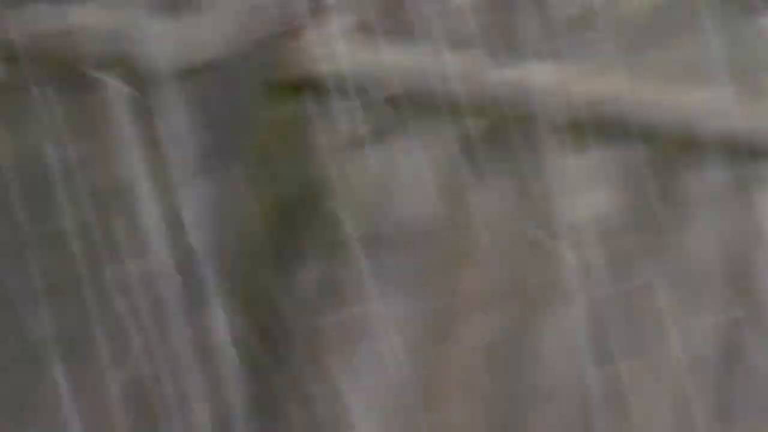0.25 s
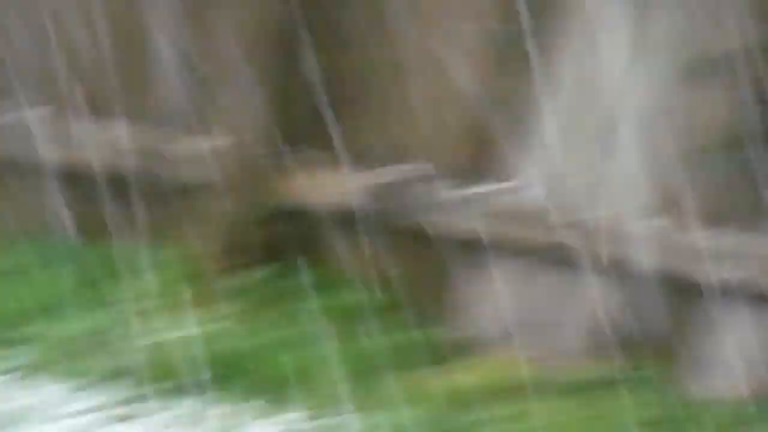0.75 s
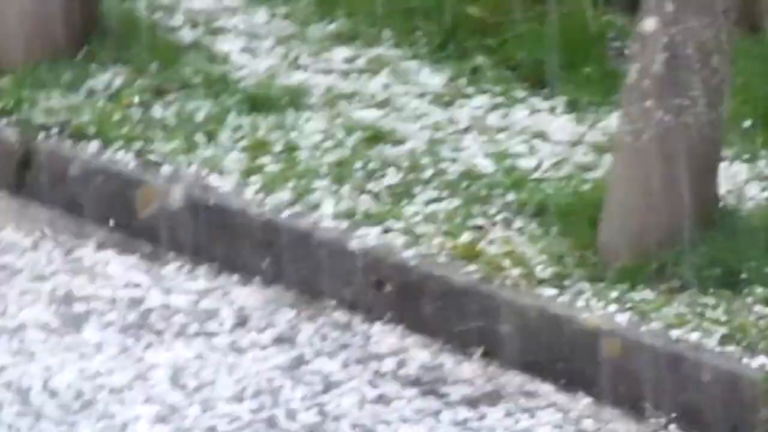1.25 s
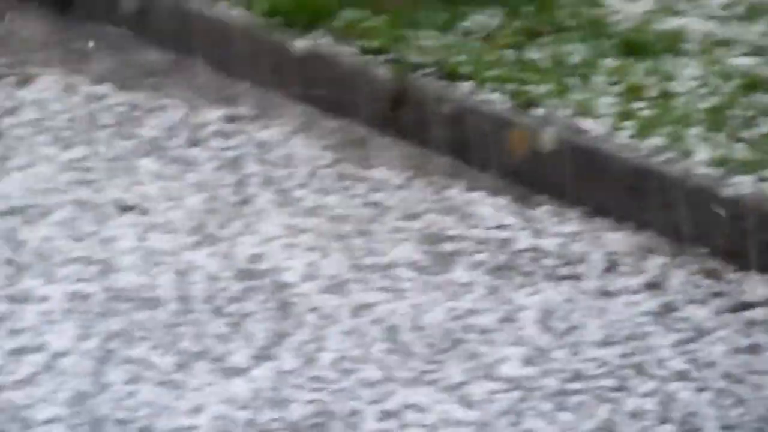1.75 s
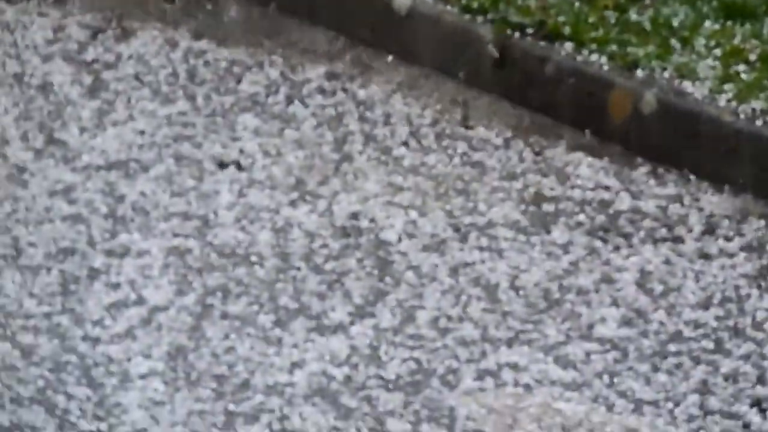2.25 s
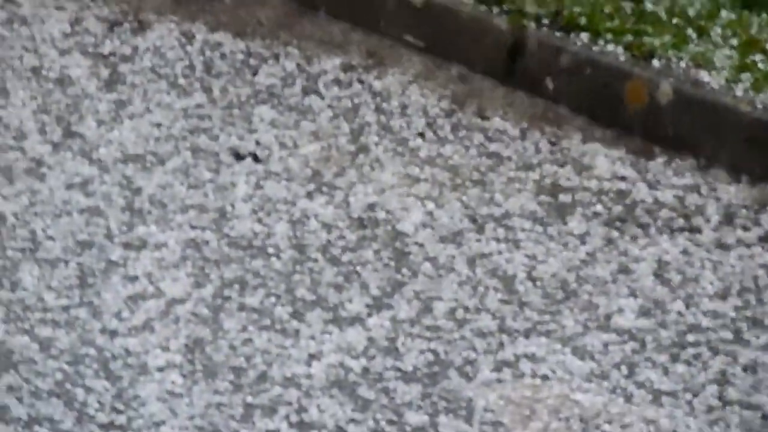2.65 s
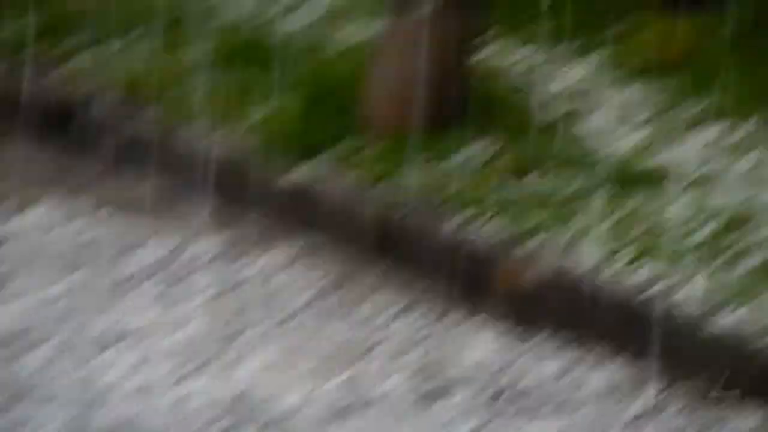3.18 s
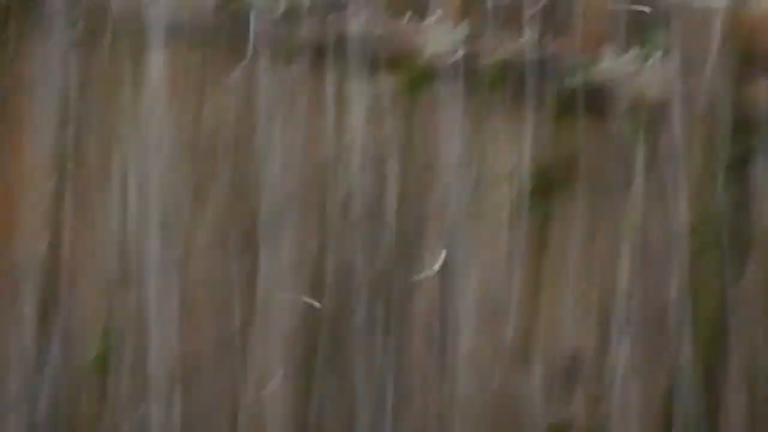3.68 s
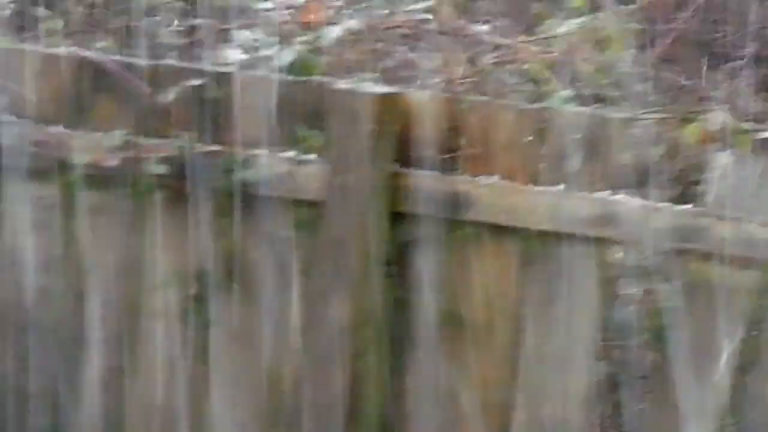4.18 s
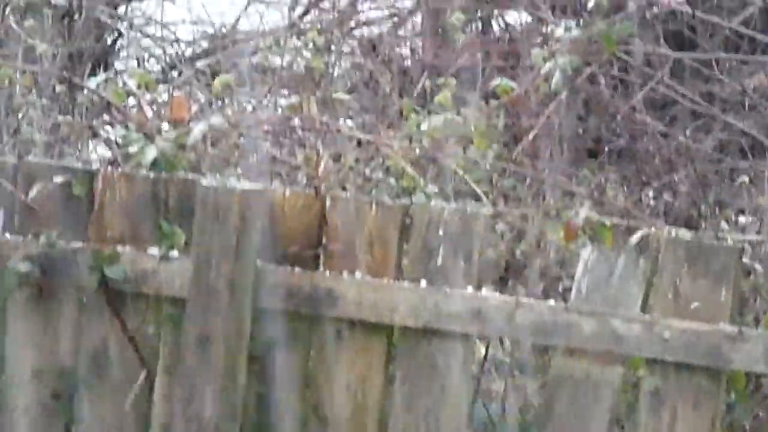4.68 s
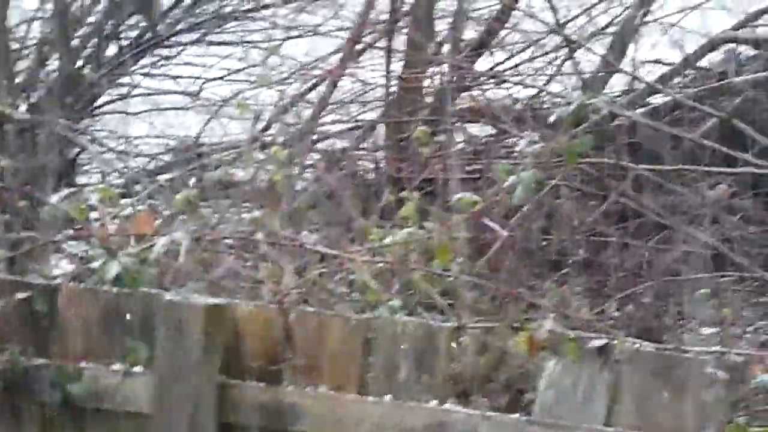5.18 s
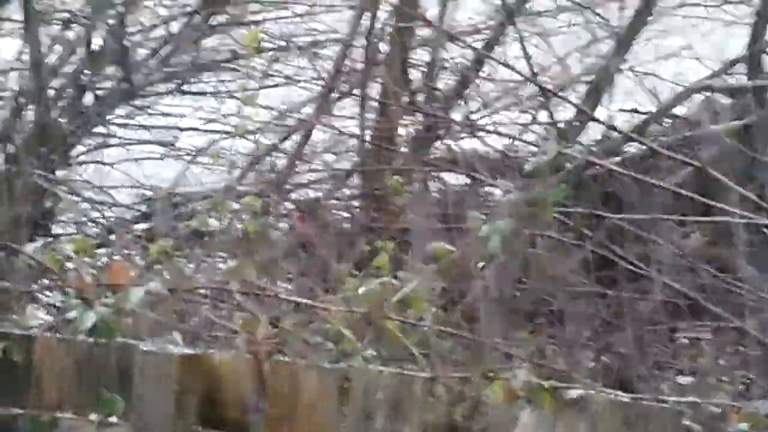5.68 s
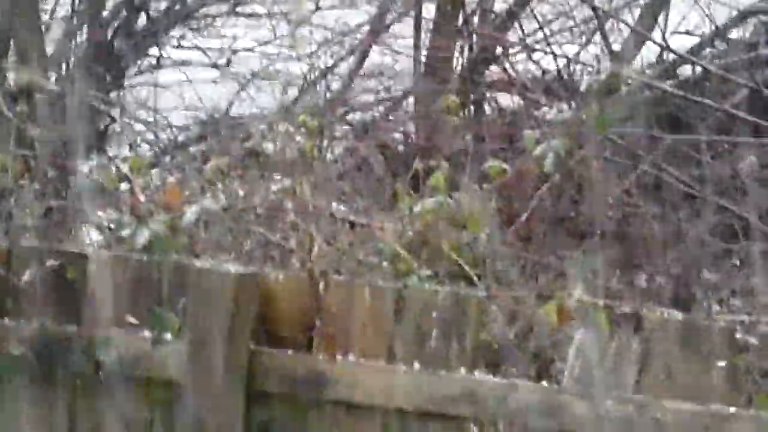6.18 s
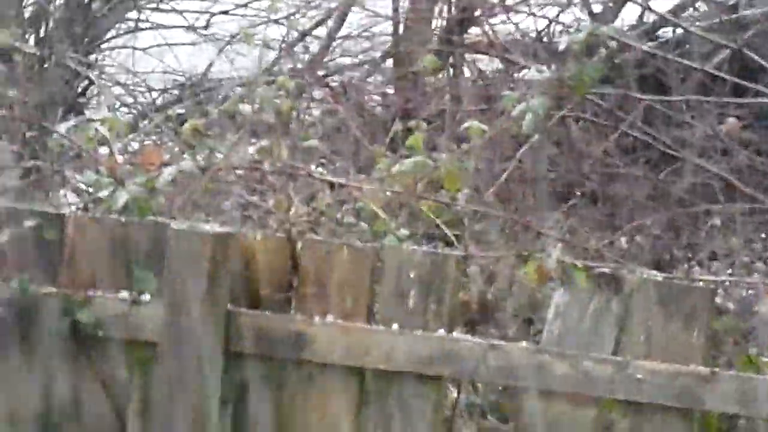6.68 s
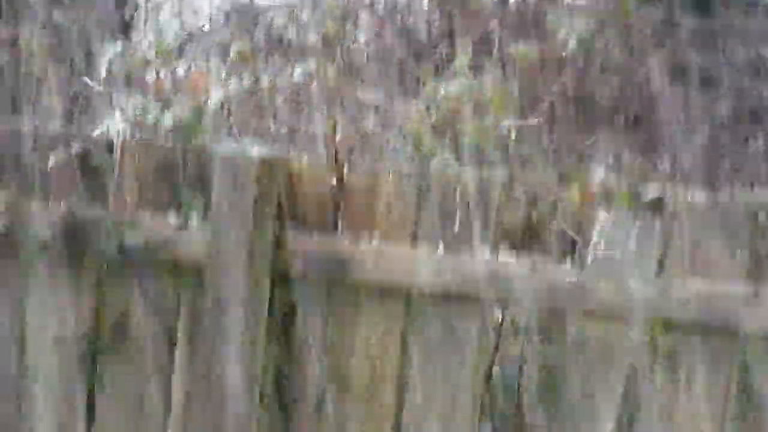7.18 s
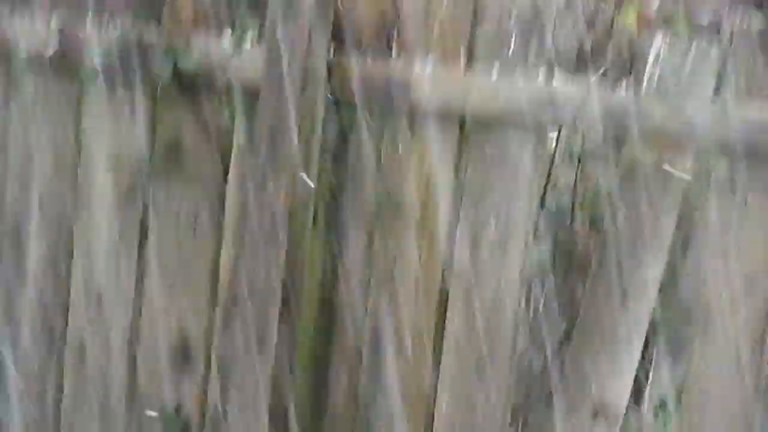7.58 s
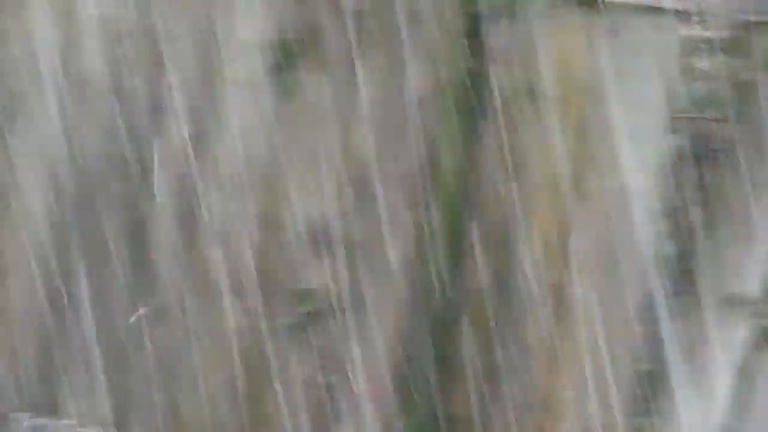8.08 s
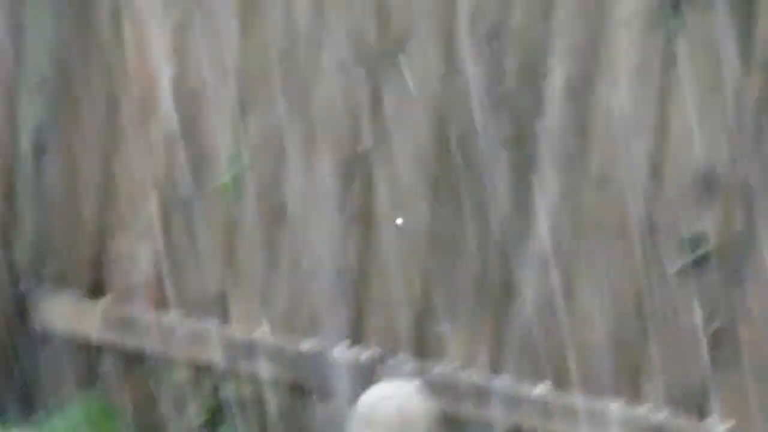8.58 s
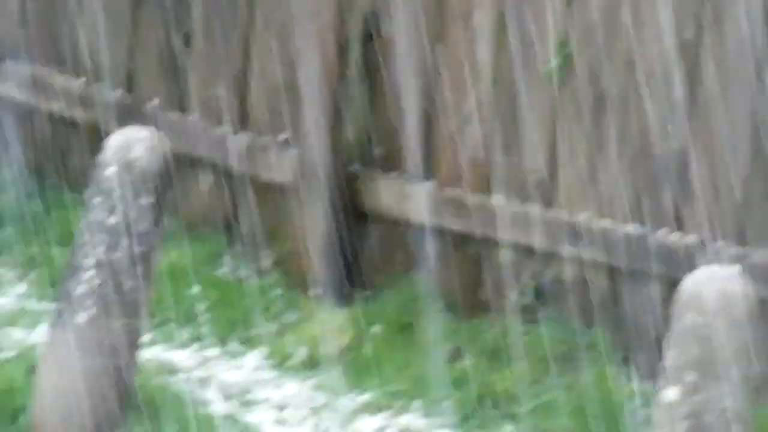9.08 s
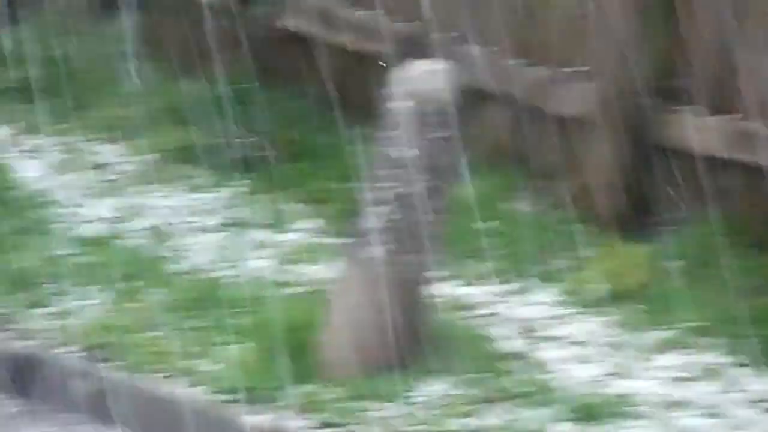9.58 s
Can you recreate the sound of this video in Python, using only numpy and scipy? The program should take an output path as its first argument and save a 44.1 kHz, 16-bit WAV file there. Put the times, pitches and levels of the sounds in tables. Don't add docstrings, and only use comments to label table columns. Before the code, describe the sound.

A hailstorm in a yard, heard by one microphone out in it. Countless stones make a dense bright hiss full of tiny ticks, over dull drumming on boards and a low wind rumble. Near stones crack and splinter on paving, knock the wooden fence or ping faintly on metal. The loudest blow comes about halfway, with a busy cluster near the end. The background dips after hard hits, then recovers.

```python
import sys
import numpy as np
from scipy import signal
from scipy.fft import rfft, irfft
from scipy.io import wavfile
from scipy.ndimage import uniform_filter1d

SR = 44100
rng = np.random.default_rng(int(sys.argv[2]) if len(sys.argv) > 2 else 0)


def boost(x):
    u = np.asarray(x, float) / 20
    return 10 ** u


def transcribe(signal):
    frames = np.atleast_2d(signal).T
    limited = np.clip(frames, -1, 1)
    pcm = np.round(limited * 32767).astype(np.int16)
    wavfile.write(sys.argv[1], SR, pcm)


N = 434385
WALL_ECHO_S, WALL_ECHO_DB = .0055, -6.


def unit(x):
    return x / np.sqrt(np.mean(x ** 2))


def colour(x, points, lo_hz, hi_hz):
    hz = np.maximum(np.arange(N // 2 + 1) * SR / N, 1)
    at, db = np.transpose(points)
    gain_db = np.interp(np.log(hz), np.log(at), db, left=-70, right=-70)
    spectrum = rfft(x) * boost(gain_db)
    inside = irfft(spectrum * (hz > lo_hz) * (hz < hi_hz), N)
    return irfft(spectrum, N) / np.std(inside)


def walk(rate):
    k = int(SR / rate)
    held = np.repeat(rng.standard_normal(N // k + 1), k)
    slewed = uniform_filter1d(uniform_filter1d(held, k), k)
    return unit(slewed[:N])


def ring(x, hz, t60):
    pole = np.exp(2j * np.pi * min(hz, SR / 2.3) / SR - np.log(1000) / (max(t60, 1e-4) * SR))
    return signal.lfilter([1], [1, -pole], x).imag


def burst(noise, length, tail):
    t = np.arange(len(noise)) / SR
    return noise * np.exp(-np.maximum(t - max(length, 0), 0) / tail)


def stones(count, spread_db, top_db):
    when, size, sign = rng.random((count, 3)).T
    level_db = np.minimum(-spread_db * np.log(size), top_db)
    hits = np.zeros(N)
    np.add.at(hits, (when * N).astype(int), np.sign(sign - .5) * boost(level_db))
    return hits


def wall_echo(x):
    return boost(WALL_ECHO_DB) * np.roll(x, int(WALL_ECHO_S * SR))


def add(out, s, x, db):
    i = int(s * SR)
    x = x[:N - i]
    out[i:i + len(x)] += x * boost(db) / np.max(np.abs(x))


# frequency in Hz, density in dB per Hz.
RUMBLE_SPECTRUM = [(15, -12), (45, 4.5), (58, 2.5), (70, 0), (100, -6.5), (170, -7.5), (220, -8)]


def rumble():
    return colour(rng.standard_normal(N), RUMBLE_SPECTRUM, 30, 110)


# frequency in Hz, density in dB per Hz.
DRUM_SPECTRUM = [(59, -38), (100, -6.5), (215, -0.5), (448, -1.5), (580, 2), (742, 0), (1030, 2.5),
                 (1570, -8.5), (2600, -7), (3380, -32), (5720, -120)]


def drumming(grain_db, t60):
    thuds = 0
    for hz in (220, 380, 620, 1050, 1500, 2300):
        hits = stones(count=1500, spread_db=2.5, top_db=5.5)
        thuds = thuds + unit(ring(hits, hz, t60)) * np.sqrt(hz)
    blur = rng.standard_normal(N) * boost(.8 * walk(12))
    return colour(blur + boost(grain_db) * unit(thuds), DRUM_SPECTRUM, 350, 1800)


# frequency in Hz, density in dB per Hz.
HISS_SPECTRUM = [(710, -30), (1200, -1), (2040, -5), (2650, -3.5), (8530, -5.5), (15000, -15), (16000, -16)]


def hiss(patchy_db, quick_db, tick_db, splat_db, splat_s):
    gust = walk(9)
    t = np.arange(2048) / SR
    swell = t / splat_s * np.exp(1 - t / splat_s)
    puffs = []
    for _ in range(3):
        shatters = np.abs(stones(count=450, spread_db=1.5, top_db=3.5))
        puffs.append(signal.fftconvolve(shatters, swell)[:N])
    bands = 0
    for k, hz in enumerate(1000 * 2 ** np.arange(0, 4.1, .5)):
        band = signal.butter(1, [hz / 1.19, hz * 1.19], "band", fs=SR, output="sos")
        puff = puffs[0] + puffs[1 + k // 5]
        swing = boost(patchy_db * gust + quick_db * walk(24)) + boost(splat_db) * puff
        bands = bands + np.sqrt(hz) * unit(signal.sosfilt(band, rng.standard_normal(N))) * swing
    ticks = unit(stones(count=7000, spread_db=5.0, top_db=15.5))
    ticks = ticks + wall_echo(ticks)
    return colour(unit(bands) + boost(tick_db) * ticks, HISS_SPECTRUM, 2500, 12000)


# start in seconds, peak in dB, upper mode in Hz,
# lower mode in Hz, lower mode peak in dB.
BOARD_KNOCKS = [
    (0.167, -26, 1000, 457, -27),
    (0.637, -19, 939, 350, -30),
    (4.329, -22, 939, 520, -29),
    (6.169, -21, 1120, 540, -28),
    (7.0615, -13.5, 1050, 405, -14),
    (8.239, -16, 1370, 552, -36),
    (8.572, -13, 1730, 525, -45),
    (9.366, -17.5, 1780, 560, -41),
    (9.442, -26, 821, 511, -45),
]


def knocks(upper_t60, lower_t60, tail):
    out = np.zeros(N)
    noise = rng.standard_normal((len(BOARD_KNOCKS), 5000))
    for (s, db, upper_hz, lower_hz, lower_db), push in zip(BOARD_KNOCKS, noise):
        push = burst(push ** 3, .0026, tail)
        push[0] += 60.0
        add(out, s, ring(push, upper_hz, upper_t60), db)
        add(out, s, ring(push, lower_hz, lower_t60), lower_db)
    return out


# frequency in Hz, t60 in seconds.
RAIL_MODES = [(4697, .19), (4542, .24), (4405, .14), (5250, .15), (2390, .016)]
# start in seconds, peak in dB.
RAIL_PINGS = [
    [(.4145, -30), (1.6372, -30), (2.2293, -33), (2.658, -31), (2.7554, -29), (3.2745, -30), (3.8726, -25),
     (4.5114, -24)],
    [(2.651, -28), (2.7352, -29), (3.27, -29), (4.5082, -24), (4.9944, -26), (5.04, -25), (5.2864, -35),
     (5.4514, -34), (5.6905, -31), (6.3296, -29), ],
    [(4.5082, -30), (5.1794, -30), (6.5301, -23), (8.4262, -29)],
    [(4.5082, -30), (4.9944, -28)],
    [(.2014, -28), (1.048, -27), (1.2256, -22), (1.7204, -27), (6.2794, -27), (7.7144, -16)],
]


def pings(rattle_s):
    out = np.zeros(N)
    for (hz, t60), hits in zip(RAIL_MODES, RAIL_PINGS):
        for (s, db), push in zip(hits, rng.standard_normal((len(hits), 10000))):
            add(out, s, ring(burst(push, 0, rattle_s), hz, t60), db - 1.5)
    return out


# start in seconds, splinters in dB,
# colour in Hz, bright spray under them in dB.
WET_BURSTS = [(.6953, -4, 2670, -18), (.8061, -12.5, 5390, -19), (1.049, -14, 2440, -20),
              (1.0977, -18, 5430, -22), (1.6382, -9.5, 4690, -15), (1.682, -4, 6000, -23),
              (1.722, -13, 2330, -11), (2.1266, -17, 2200, -15), (2.6519, -16, 4540, -18),
              (2.7362, -12.5, 4690, -14), (3.2294, -5.5, 3990, -13.5), (3.8734, -8.5, 4700, -13),
              (4.5092, -12, 4700, -11), (5.1606, 2, 2370, -10), (5.8696, -9, 6770, -28),
              (6.1733, -21, 2600, -22), (6.482, -8, 8600, -19), (6.6355, -7, 6500, -16),
              (7.2285, -16, 4490, -17), (7.7154, -25, 2470, -18), (8.0506, -5.5, 3250, -18),
              (8.3689, -19, 2980, -13), (8.4003, -6, 6040, -16), (8.6272, -4, 2450, -23),
              (8.747, -12, 2200, -14), (8.9161, -8.5, 2490, -19), (8.9545, -5, 2270, -21),
              (8.968, 0.5, 4180, -35), (9.1216, -2.5, 3360, -22), (9.3454, -7.5, 6970, -19)]
# start in seconds, crack in dB, splinters in dB, colour in Hz.
PAVING_BREAKS = [(.12, -10, -12, 6860), (.4182, -7, -7, 5090), (.5123, -8, -7.5, 6650),
                 (.6331, -9, -7.5, 2970), (.6709, -10, -6, 4330), (.7384, -8, -11, 4440),
                 (.8866, -11, -13, 6980), (1.3135, -8, -11, 6940), (1.4047, -5, -9.5, 4300),
                 (1.9024, -5, -5, 8620), (2.2307, -1, -11, 4760), (2.2715, -4, -12, 8240),
                 (2.309, -11, -16, 9810), (3.2761, -1, -6, 4900), (3.5233, -12, -17, 7290),
                 (4.121, -6, -11, 5970), (4.4464, -5, -11, 5850), (4.8923, -11, -13, 7250),
                 (4.9973, -8, -6.5, 5300), (5.6923, -17, -16, 4540), (6.3332, -8, -7.5, 4570),
                 (6.7054, -8, -9, 5500), (7.0344, -7, 0., 6980), (7.5317, -10, -8, 4870),
                 (7.9246, -10, -12, 8240), (8.114, -8, -7, 6050), (8.8793, -8, -12, 4860),
                 (9.4056, -13, -11, 4690), (9.4965, -11, -11, 4680), (9.7195, -10, -3, 8300)]


def splinters(shatter_cycles, shatter_db, tail, spray_db):
    rush = np.zeros(N)
    rows = list(WET_BURSTS) + [(s, db, hz, -16.) for s, _, db, hz in PAVING_BREAKS]
    noise = rng.standard_normal((len(rows), 2, 3000))
    for (s, db, hz, bright_db), (pieces, spray) in zip(rows, noise):
        pieces, spray = burst(pieces, .009, tail), burst(spray, .009, tail)
        add(rush, s, ring(pieces, hz, shatter_cycles / hz), db + shatter_db)
        add(rush, s, ring(spray, 9600.0, 0.00053), db + bright_db + spray_db)
    return rush


# start in seconds, peak in dB.
ICE_CHIPS = [(.2044, -12), (.2536, -12), (.5984, -10), (1.2642, -15), (1.4275, -10), (2.154, -7),
             (2.3258, -17), (3.3636, -14), (3.4259, -13), (3.7273, -14), (4.4872, -11), (5.0561, -10),
             (5.1638, -2), (5.1663, 0), (5.1681, 1), (5.4525, -15), (5.875, -12), (5.8882, -10),
             (5.9877, -11), (7.0379, -4), (7.0395, -2), (7.3858, -14), (7.7007, -11), (8.2122, -9),
             (8.2242, -9), (8.3694, -7), (8.9683, -1), (8.9738, -3), (9.3134, -12), (9.3289, -12)]


def cracks(turns):
    out, t = np.zeros(N), np.arange(-24, 24) / SR
    ice_hz, chip_hz, chip_scatter = 8200, 6300, .14
    breaks = [(s, db, np.sqrt(hz * ice_hz)) for s, db, _, hz in PAVING_BREAKS]
    echoes = [(s + WALL_ECHO_S, db + WALL_ECHO_DB, hz) for s, db, hz in breaks]
    pitches = chip_hz * np.exp(chip_scatter * rng.standard_normal(len(ICE_CHIPS)))
    chips = [(s, db, hz) for (s, db), hz in zip(ICE_CHIPS, pitches)]
    for s, db, hz in breaks + echoes + chips:
        swing = np.sin(2 * np.pi * hz * t + .5) * np.exp(-(t * hz / turns) ** 2)
        add(out, s - 21 / SR, swing, db - .7)
    return out


# start in seconds, peak in dB, rattle length in ms, rattle in dB.
PANEL_BLOWS = [
    (0.6897, -0.5, 2., -23),
    (5.1608, 4, 6.8, -13.5),
    (8.627, -5, 5., -14),
    (8.9674, -3.5, 3., -10.5),
    (9.1199, -5, 13.6, -6.5),
    (9.7376, -5, 12.5, -4),
]
# frequency in Hz, width in Hz, level in dB.
PANEL_MODES = [
    [(392, 72, -12), (870, 43, -8), (1360, 56, 4), (1600, 65, -17), (2700, 86, -9), (4600, 360, -13)],
    [(420, 24, -2), (560, 130, -4), (698, 110, 1), (2270, 73, 0), (3580, 220, -3), (4550, 210, -4),
     (6220, 630, -4.5)],
    [(370, 80, -17), (1330, 210, -8), (1720, 200, 6), (2060, 120, -4), (2570, 200, -8), (5200, 1500, -14)],
    [(352, 85, -6), (890, 50, 1), (1370, 110, 2), (2510, 85, -6), (4200, 240, -4.5)],
    [(236, 50, -7), (378, 42, 1), (620, 130, -10), (906, 35, -1), (1270, 200, -7.5), (1570, 93, -1.5),
     (1930, 97, -10), (2560, 70, -9), (3200, 130, -9)],
    [(230, 60, -1), (392, 70, -3), (820, 150, -8), (1300, 120, -5), (1660, 200, -5), (2600, 400, -9),
     (6500, 4300, -10)],
]


def blows(tail, contact_ms):
    out = np.zeros(N)
    noise = rng.standard_normal((len(PANEL_BLOWS), 6000))
    t = np.arange(6000) / SR / (contact_ms / 1e3)
    contact = t * np.exp(-t) * 1e3 / (contact_ms * SR)
    for (s, db, ms, rattle_db), modes, push in zip(PANEL_BLOWS, PANEL_MODES, noise):
        rattle = burst(push * np.abs(push), ms / 1e3, tail) * boost(rattle_db) / 13
        push = rattle + contact + wall_echo(contact)
        panel = 0
        for hz, width, mode_db in modes:
            t60 = np.log(1000) / np.pi / width
            panel = panel + boost(mode_db) * width * ring(push, hz, t60)
        add(out, s, panel, db)
    return out


# start in seconds, gain in dB.
GAIN_DUCKS = [(-.05, -1), (.7, -5.5), (2.235, -8), (3.285, -5), (4.15, -2.5), (5.175, -8.5), (6.72, -1),
              (7.05, -3), (8.66, -1.5), (8.975, -4.5), (9.14, -1)]


def ducking(t):
    fall_s, hold_s, creep_db_per_s = 0.05, 0.47, 9
    dips = []
    for s, db in GAIN_DUCKS:
        fall = np.clip((t - s) / fall_s, 0, 1) * db
        dips.append(fall + creep_db_per_s * np.maximum(t - s - hold_s, 0))
    return np.minimum(np.min(dips, axis=0), 0)


# time in seconds, fall of hail in dB, wind in dB.
STORM_COURSE = [(0, -26.5, -41), (.6, -27, -44), (1.2, -25.5, -40), (1.65, -26, -44), (1.93, -26.5, -42),
                (2.95, -24.5, -39.5), (3.25, -24.5, -40), (3.7, -24.5, -37), (4.3, -25.5, -42),
                (4.75, -27.5, -41), (5.05, -27.5, -45), (5.55, -28, -45), (5.85, -22.5, -40),
                (6.15, -23.5, -41), (6.6, -24.5, -41), (7.8, -26.5, -45.5), (8.6, -25.5, -41.5),
                (9.85, -26.5, -45)]


def scene():
    t = np.arange(N) / SR
    s, *columns = np.transpose(STORM_COURSE)
    fall_db, wind_db = (np.interp(t, s, c) for c in columns)
    calm_db = -41.5
    drum_db = fall_db - 5 + 0.067 * (wind_db - calm_db)
    far = boost(wind_db) * rumble()
    far += boost(drum_db) * drumming(grain_db=-14.0, t60=0.012)
    far += boost(fall_db) * hiss(patchy_db=.4, quick_db=.8, tick_db=-11, splat_db=-14.5, splat_s=.005)
    near = knocks(upper_t60=0.015, lower_t60=0.054, tail=0.0044)
    near += pings(rattle_s=0.0035)
    near += splinters(shatter_cycles=3.2, shatter_db=-8, tail=0.0041, spray_db=5.0)
    near += cracks(turns=.58)
    near += blows(tail=0.012, contact_ms=0.035)
    near = signal.sosfilt(signal.butter(4, 250, "high", fs=SR, output="sos"), near)
    return np.tile(boost(ducking(t)) * far + near, (2, 1))


def low_pass(x):
    return signal.sosfilt(signal.butter(12, 16430, fs=SR, output="sos"), x)


def record(dry):
    clipped = np.clip(dry, -1, 1)
    top_cut = signal.ellip(10, .1, 14, 15780, fs=SR, output="sos")
    mix = signal.sosfiltfilt(top_cut, clipped)
    return low_pass(mix)


dry = scene()
out = record(dry)
transcribe(out)
```